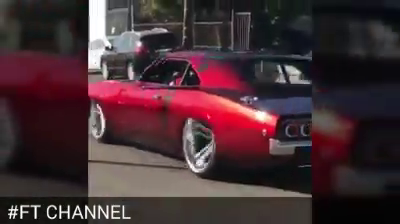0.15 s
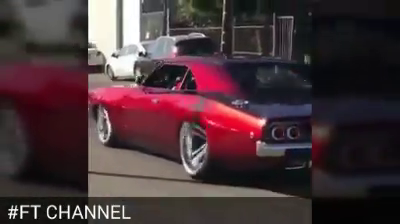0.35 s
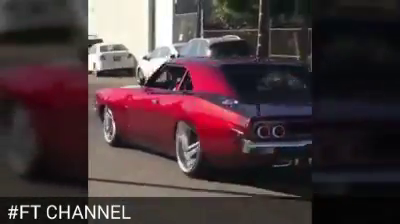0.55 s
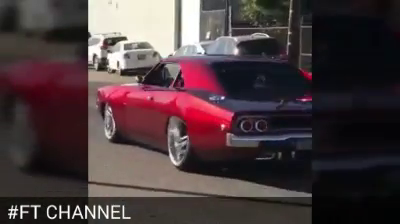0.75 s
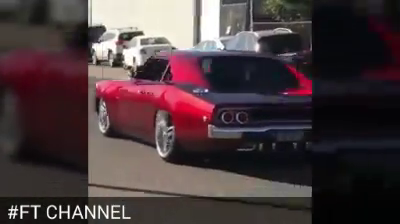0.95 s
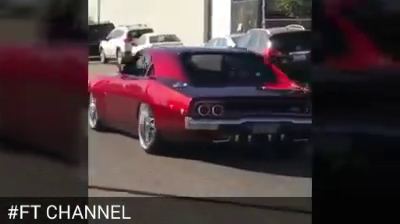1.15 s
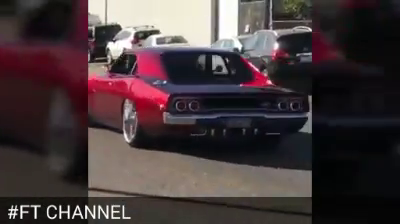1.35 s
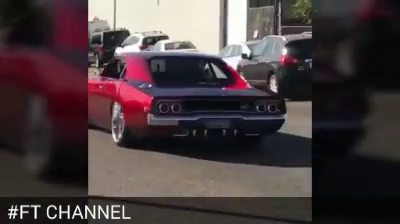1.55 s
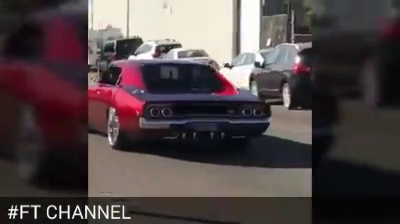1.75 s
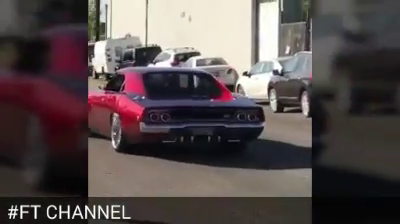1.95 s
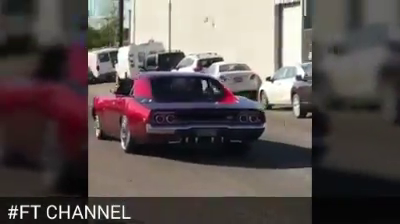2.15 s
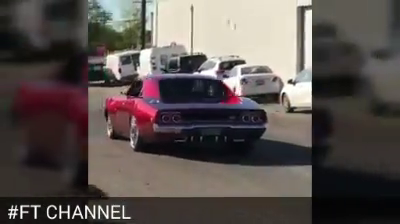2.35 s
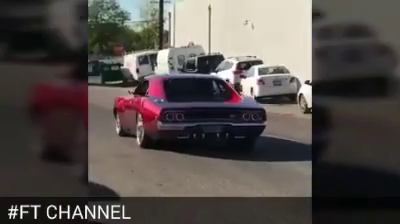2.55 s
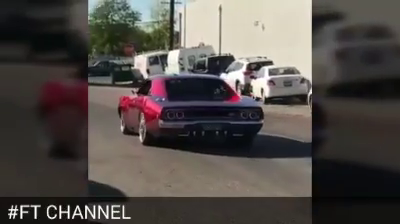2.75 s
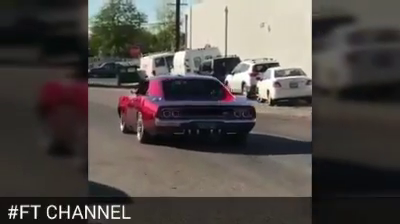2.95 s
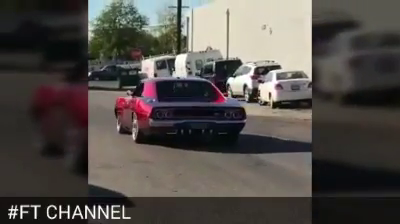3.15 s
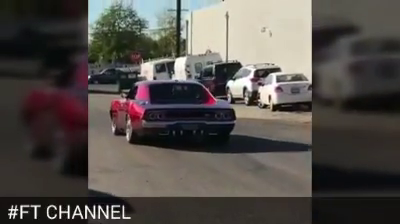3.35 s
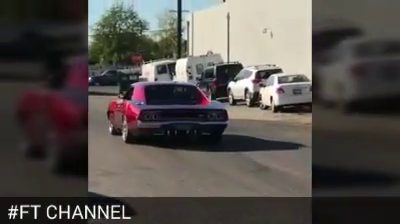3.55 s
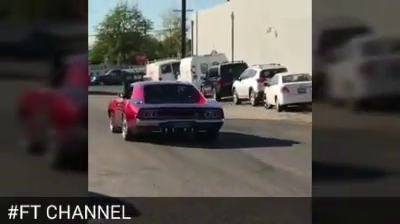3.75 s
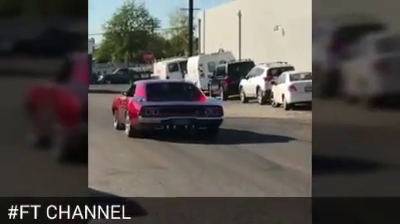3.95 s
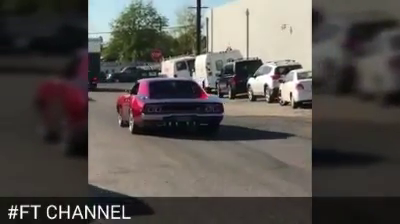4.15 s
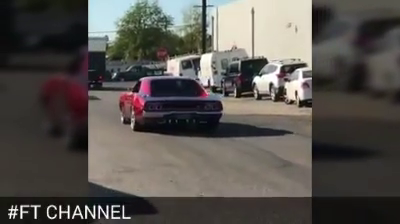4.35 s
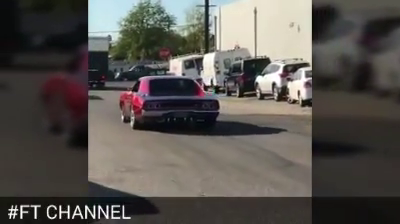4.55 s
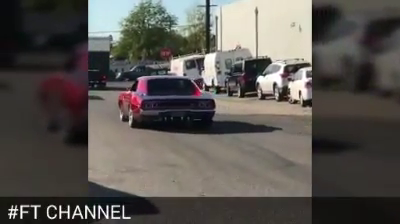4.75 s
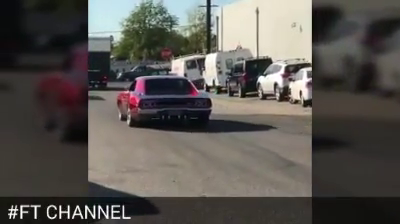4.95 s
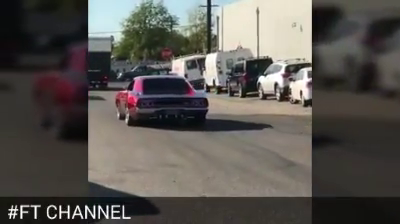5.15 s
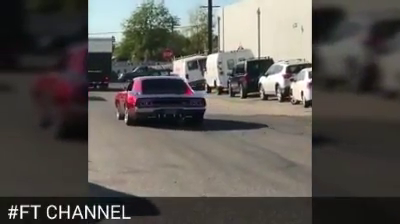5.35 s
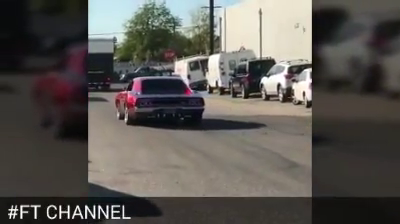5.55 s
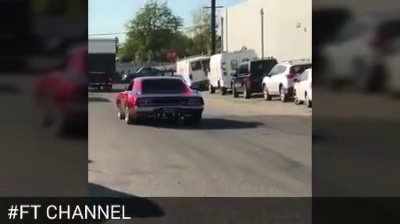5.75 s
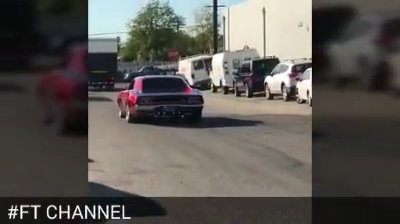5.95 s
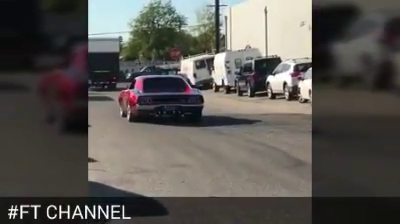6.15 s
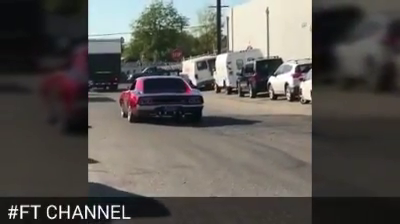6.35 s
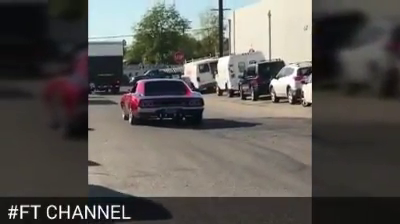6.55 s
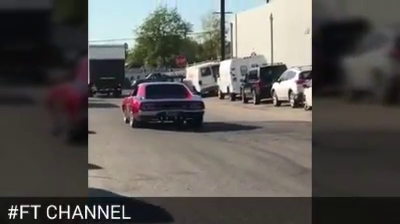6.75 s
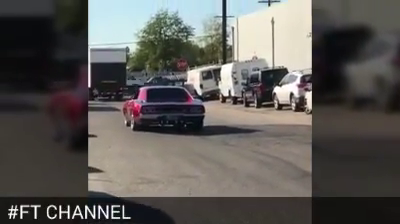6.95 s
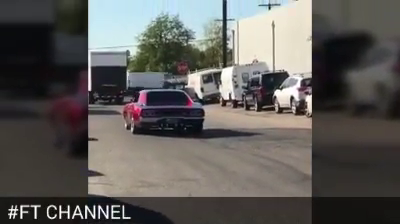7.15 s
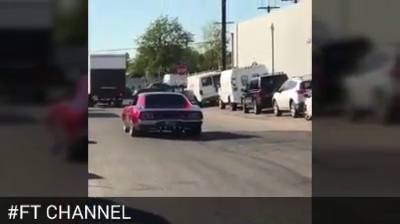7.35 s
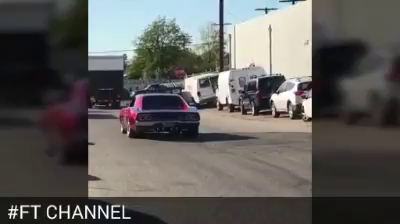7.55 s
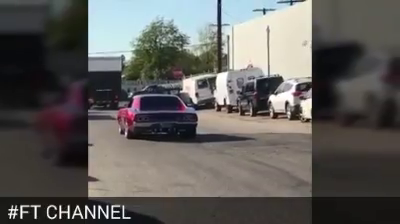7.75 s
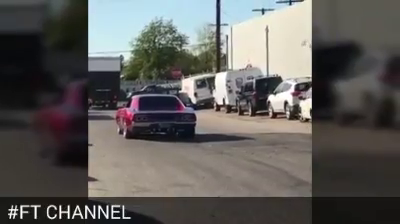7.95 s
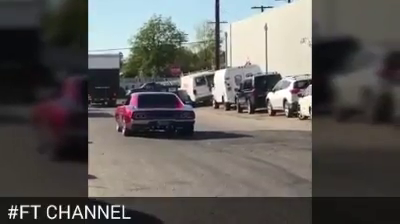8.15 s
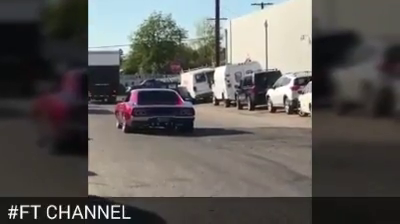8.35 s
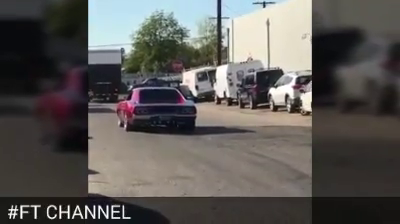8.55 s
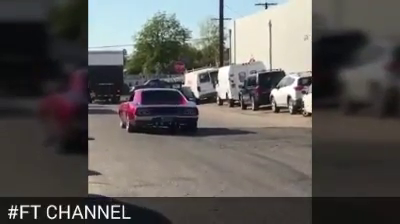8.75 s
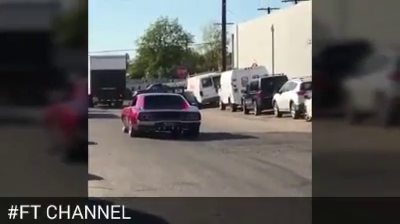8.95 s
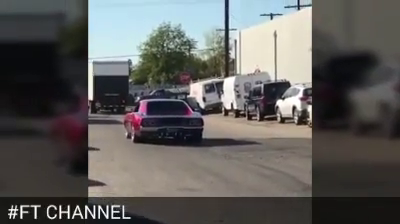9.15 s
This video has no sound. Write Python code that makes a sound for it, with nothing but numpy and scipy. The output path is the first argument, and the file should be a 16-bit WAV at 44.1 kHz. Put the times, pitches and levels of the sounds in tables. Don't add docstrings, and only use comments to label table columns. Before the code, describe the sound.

Deep, uneven exhaust burble from a large old car rolling off outdoors, loping four times a second, with hiss, pops and slight wall echo.

```python
import sys
import numpy as np
from scipy import signal
from scipy.fft import rfft, irfft, next_fast_len
from scipy.io import wavfile
from scipy.ndimage import uniform_filter1d

SR = 44100
rng = np.random.default_rng(int(sys.argv[2]) if len(sys.argv) > 2 else 0)


def pcm_store(signal):
    levels = np.round(np.clip(np.atleast_2d(signal), -1, 1) * 32767)
    wavfile.write(sys.argv[1], SR, levels.astype(np.int16).T)


def ratio_of_db(decibels):
    return 10 ** (np.asarray(decibels, float) / 20)


N = 405279

BEAT_DB = [3, -2.5, 2.2, -3, 1.2, -3.5, 1.5, -2.5, 2, -1.5]
# time_s, facing (0 side, 1 rear)
TAIL_FACING = [
    (0, 0),
    (1.3, 0),
    (1.9, 1),
    (9.19, 1),
]
# frequency_hz, density_db (per Hz)
LOW_REAR_SPECTRUM = [(150, -43), (260, -16.5), (286, 2.5), (387, -18.5), (439, -14), (487, -11), (728, 3),
                     (802, 1.5), (871, 4.5), (1200, -26.5), (1560, -38), (2640, -120)]


def rms_one(x):
    return x / np.sqrt(np.mean(x ** 2) + 1e-20)


def in_time(rows):
    s, *columns = np.transpose(rows)
    return [np.interp(np.arange(N) / SR, s, c) for c in columns]


def drift(rate):
    r = np.exp(-80 * np.pi * rate / SR)
    white = rng.standard_normal(N // 40 + 2002)
    slow = signal.lfilter([1], [1, -2 * r, r * r], white)[2000:]
    return np.interp(np.arange(N) / 40, np.arange(len(slow)), rms_one(slow))


def colour(x, points):
    size = next_fast_len(N + SR)
    hz, db = np.transpose(points)
    log_hz = np.log(np.maximum(np.arange(size // 2 + 1), 1) * SR / size)
    outside = np.maximum(np.log(hz[0]) - log_hz, 0) + np.maximum(log_hz - np.log(hz[-1]), 0)
    level_db = np.maximum(np.interp(log_hz, np.log(hz), db) - 60 * outside, -120)
    cepstrum = irfft(level_db * np.log(10) / 20, size)
    cepstrum[1:size // 2] *= 2
    cepstrum[size // 2 + 1:] = 0
    response = np.exp(rfft(cepstrum))
    return rms_one(irfft(rfft(x, size) * response, size)[:N])


def resonate(x, modes):
    out = 0
    for hz, width_hz, db in modes:
        r = np.exp(-np.pi * width_hz / SR)
        ring = rms_one(signal.lfilter([1, 0, -1], [1, -2 * r * np.cos(2 * np.pi * hz / SR), r * r], x))
        out = out + ratio_of_db(db + 2.8 * drift(5)) * ring
    return out


def hum(turns, per_s, near_db, surge_db):
    # order (x firing rate), level_db (over nearness),
    # slope_db (per firing a second over the mean), side_db (more from the side), surge_share
    main_orders = [
        (2, -8.5, 1, 5, 1.9),
        (3, -5.5, 0.55, -0.9, 0.62),
        (5, -12, 2, -3.5, 1.6),
    ]
    # order (x firing rate), level_db
    weak_orders = [(1, -19), (1.4, -19), (1.5, -15), (1.6, -19), (2.5, -17), (3.5, -21), (4, -18)]
    # time_s, level_db
    drone_curve = [(0, 0.5), (.5, 0), (1.3, -2.5), (2.2, 0.5), (2.45, 3), (4.15, 4), (4.5, -2), (6.5, 2.8),
                   (7.8, -5.5), (8.5, 2.2), (9.19, -1.1)]
    mean_per_s = 41.2
    turn, = in_time(TAIL_FACING)
    levels = []
    for order, db, slope, side_db, share in main_orders:
        tuned_db = db + slope * (per_s - mean_per_s) + side_db * (1 - turn)
        levels.append((round(order), near_db + tuned_db + share * surge_db))
    levels[1] = (levels[1][0], levels[1][1] + in_time(drone_curve)[0])
    levels += [(order, near_db + db) for order, db in weak_orders]
    out = 0
    for order, db in levels:
        phase = 2 * np.pi * (order * turns + rng.random()) + 0.14 * order * drift(5)
        beat_start = rng.random() * (order != 5)
        beat = np.sin(2 * np.pi * (2 * turns / len(BEAT_DB) + beat_start))
        depth = {1.5: .3, 5: .5}.get(order, .15)
        waver_db = 0.99 * drift(6.4) + 3.8 * (order % 1 > 0) * drift(1.2)
        out = out + np.sqrt(2) * ratio_of_db(db + waver_db) * (1 + depth * beat) * np.sin(phase)
    return out


def firings(turns, uneven_db, jitter_s):
    at = np.flatnonzero(np.diff(np.floor(turns)) > 0)
    luck = rng.standard_normal((500, 2))[:len(at)].clip(-1.7, 1.7)
    clicks = np.zeros(N)
    when = np.clip(at + (jitter_s * SR * luck[:, 0]).astype(int), 0, N - 1)
    clicks[when] = ratio_of_db(np.resize(BEAT_DB, len(at)) + uneven_db * luck[:, 1])
    return clicks


def thumps(clicks, thump_db):
    beat_push = [1.3, -.9, -.4, 1.0, -1.2, .5, .9, -1.4, .7, -.5]
    # frequency_hz, density_db (per Hz)
    muffler_spectrum = [(16, -51.5), (28, -14.5), (64, 1.5), (119, 2.5), (140, -5), (166, -3), (215, -8),
                        (233, -8), (273, -26.5), (375, -31.5), (420, -39.5), (550, -48), (920, -120)]
    at = np.flatnonzero(clicks)
    push = np.zeros(N)
    push[at] = np.resize(beat_push, len(at)) + .6 * rng.standard_normal(500)[:len(at)]
    thud = colour(rms_one(push) + .55 * rng.standard_normal(N), muffler_spectrum)
    steady = thud / np.sqrt(uniform_filter1d(thud ** 2, SR // 4) + 1e-9)
    return ratio_of_db(thump_db - 5.5) * steady


def gas(clicks, gas_db, far_db, surge_db):
    # frequency_hz, density_db (per Hz)
    low_side_spectrum = [(150, -37), (260, -13), (363, -16.5), (434, -2.5), (688, -3.5), (894, 2),
                         (984, -4), (1200, -22), (1560, -34.5), (2640, -120)]
    high_side_spectrum = [(620, -30.5), (1050, -13), (1430, -7.5), (1800, -1), (2040, -18.5), (2490, -10),
                          (2690, -17.5), (3300, -30.5), (4290, -53.5), (7260, -120)]
    high_rear_spectrum = [(620, -24), (1050, -2), (1220, -6.5), (1390, 0.5), (1510, 0), (1750, 4),
                          (1940, 0), (2000, -7), (2370, 2.5), (3300, -26.5), (4290, -61), (7260, -120)]
    hiss_spectrum = [(2900, -15), (3200, -15), (3600, 1), (4200, 9.5), (4500, 3.5), (4800, -0.5),
                     (5400, -20.5), (6000, -28.5)]
    # frequency_hz, width_hz, level_db
    side_modes = [
        (890, 35, -2),
        (1790, 55, -7),
        (1260, 80, -12),
    ]
    low_rear_modes = [(875, 45, -6), (745, 60, -7), (615, 45, -17), (440, 35, -16)]
    high_rear_modes = [(1740, 80, -12), (1410, 60, -11), (1590, 50, -14), (2330, 55, -18)]
    turn, = in_time(TAIL_FACING)
    gust_db, gusts_per_s = 1.5, 9
    low_db = gas_db + .6 * surge_db + gust_db * drift(gusts_per_s)
    high_db = gas_db + 1.5 - 0.96 * far_db + 0.49 * surge_db + gust_db * drift(gusts_per_s)
    hiss_db = gas_db - 11.5 - 0.7 * far_db + 0.99 * surge_db + 1.1 * gust_db * drift(gusts_per_s)
    high_db = high_db + 1.5 * (1 - turn)
    fade = np.exp(-1 / (.0095 * SR))
    burst = rms_one(signal.lfilter([1], [1, -2 * fade ** 2, fade ** 4], clicks))
    white = rng.standard_normal((3, N))
    low, high = white[0] * (1.6 + burst), white[1] * (4.5 + burst)
    low_side = colour(low, low_side_spectrum) + resonate(low, side_modes[:1])
    low_rear = colour(low, LOW_REAR_SPECTRUM) + resonate(low, low_rear_modes)
    high_side = colour(high, high_side_spectrum) + resonate(high, side_modes[1:])
    high_rear = colour(high, high_rear_spectrum) + resonate(high, high_rear_modes)
    bark = ratio_of_db(low_db) * rms_one((1 - turn) * low_side + turn * low_rear)
    rasp = ratio_of_db(high_db) * rms_one((1 - turn) * high_side + turn * high_rear)
    hiss = ratio_of_db(hiss_db) * colour(white[2] * (6 + burst), hiss_spectrum)
    return bark + rasp + hiss


def puffs(far_db):
    # frequency_hz, density_db (per Hz)
    air_spectrum = [(4500, -20.5), (4900, 4), (6200, 5.5), (7000, -0.5), (8500, 2.5), (8700, -34)]
    return ratio_of_db(-49.5 - 2.3 * far_db) * colour(rng.standard_normal(N), air_spectrum)


def street(x):
    # delay_s, level_db
    wall_echoes = [
        (.0213, -15),
        (.047, -16),
        (.083, -18),
    ]
    return x + sum(ratio_of_db(db) * np.roll(x, round(s * SR)) for s, db in wall_echoes)


def cracks():
    # start_s, peak_db
    hard_firings = [(0.151, -20), (0.334, -23), (0.691, -31), (0.781, -25.5), (1.229, -24.5), (2.626, -27),
                    (3.148, -27.5), (3.262, -31), (3.41, -34.5), (3.747, -33), (4.297, -35.5), (4.515, -32),
                    (4.761, -31), (4.919, -31), (5.242, -34.5), (5.484, -31), (6.52, -31.5), (6.588, -31.5),
                    (6.946, -32.5), (7.047, -24.5), (7.146, -26.5), (7.239, -27), (7.334, -29),
                    (7.468, -25), (7.573, -26), (7.619, -28.5), (7.857, -29), (8.279, -26), (8.524, -33.5),
                    (8.836, -28.5)]
    clicks = np.zeros(N)
    s, db = np.transpose(hard_firings)
    clicks[(s * SR).astype(int)] = ratio_of_db(db)
    spit = signal.lfilter([1], [1, -np.exp(-1 / (0.014 * SR))], clicks + 1e-18)
    source = spit * rng.standard_normal(N) + 20 * clicks
    return ratio_of_db(-11.5) * np.sqrt(np.mean(source ** 2)) * colour(source, LOW_REAR_SPECTRUM)


def scene():
    # time_s, firings_per_s
    speed_curve = [(0, 41.6), (.85, 41.9), (1.19, 43), (1.5, 42.6), (1.8, 42), (2.1, 40.5), (3.56, 40.2),
                   (3.85, 40.6), (4.45, 40.3), (5.04, 41.8), (5.34, 40.8), (5.93, 40.1), (6.23, 40.35),
                   (6.55, 41.4), (7.11, 41.9), (8.3, 42), (8.6, 41.1), (9.19, 41.1)]
    # time_s, nearness_db, gas_db
    car_curve = [(0, -19, -39), (.8, -20.5, -39), (1.35, -21.5, -39), (1.8, -24, -42), (2.4, -22.5, -44),
                 (3.1, -23.5, -43.5), (4, -25, -44), (4.4, -25, -43.5), (5.2, -26.5, -44.5),
                 (5.8, -25.5, -45), (6.5, -27, -43), (7.3, -25, -44), (8.3, -26.5, -42), (9.19, -27, -43)]
    # time_s, depth_db, lag_surges
    surge_curve = [(0, -2, -0.043), (.6, 1, -0.52), (1.3, 0, .16), (1.8, 3, .17), (2.3, 2.5, .15),
                   (2.9, 1, -0.055), (3.5, 0, 0.0057), (4.2, 1.5, -.36), (4.8, 2.5, -.38),
                   (6.3, 2.2, -0.43), (6.8, -0.1, -.38), (7.3, 0.06, -.37), (7.8, 2, -.45), (8.3, 1, -.42),
                   (9.19, 1, -0.43)]
    per_s, = in_time(speed_curve)
    near_db, gas_db = in_time(car_curve)
    depth_db, lag = in_time(surge_curve)
    turn, = in_time(TAIL_FACING)
    turns = np.cumsum(per_s) / SR
    surge_db = depth_db * np.cos(2 * np.pi * (turns / len(BEAT_DB) - lag))
    far_db = near_db[0] - near_db
    clicks = firings(turns, uneven_db=3.0, jitter_s=0.0012)
    thump_db = near_db - 2.0 * (1 - turn) + 0.17 * surge_db
    exhaust = thumps(clicks, thump_db) + gas(clicks, gas_db, far_db, surge_db) + cracks()
    note = hum(turns, per_s, near_db, surge_db)
    return (note + ratio_of_db(0.5) * street(exhaust) + puffs(far_db))[None]


def low_pass(x):
    return signal.sosfilt(signal.butter(12, 8550, fs=SR, output="sos"), x)


def record(dry):
    cut = signal.sosfilt(signal.butter(3, 42, "high", fs=SR, output="sos"), dry)
    return low_pass(cut)


dry = scene()
out = record(dry)
pcm_store(out)
```